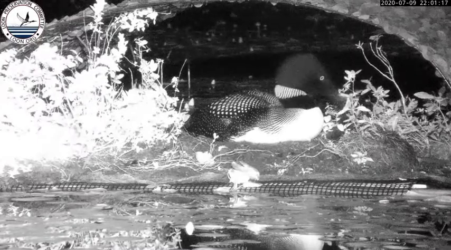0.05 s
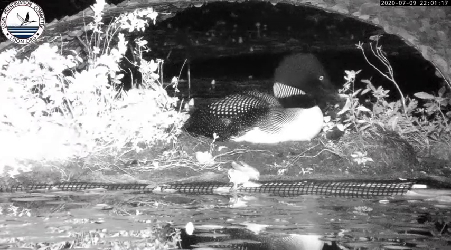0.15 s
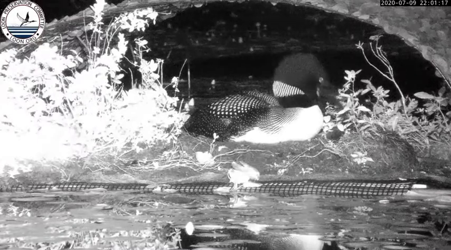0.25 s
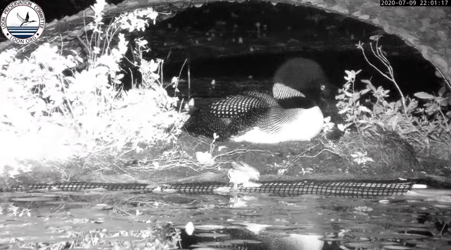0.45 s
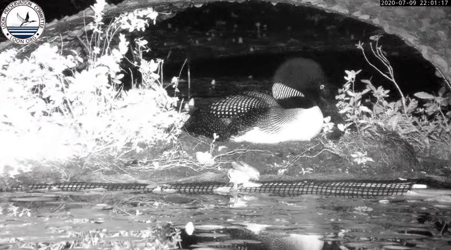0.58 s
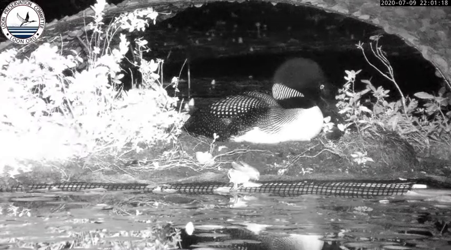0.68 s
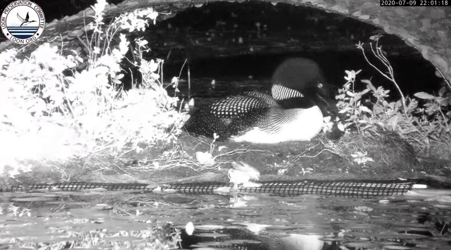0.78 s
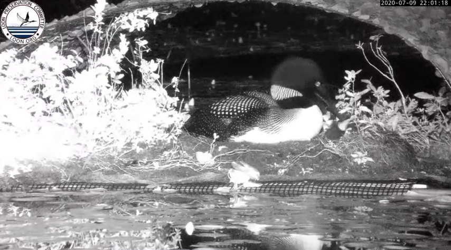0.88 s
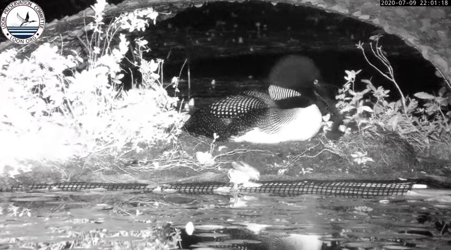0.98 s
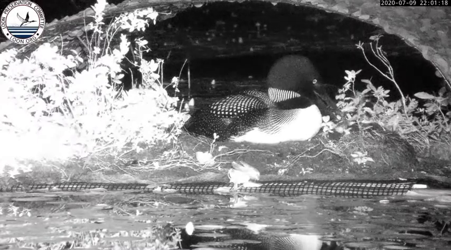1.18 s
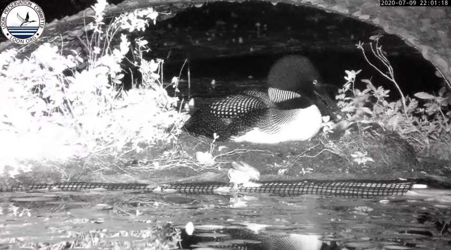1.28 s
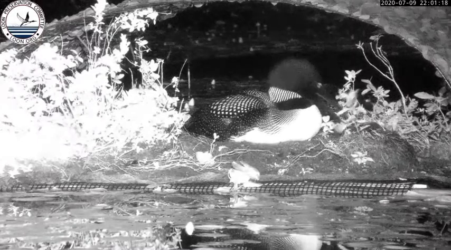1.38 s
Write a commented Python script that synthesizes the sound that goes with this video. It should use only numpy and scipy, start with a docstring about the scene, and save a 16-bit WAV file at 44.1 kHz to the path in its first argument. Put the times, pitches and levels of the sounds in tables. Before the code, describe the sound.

Close to the microphone, a nesting loon gives a short hoot that jumps up in pitch and falls, then a lower, gentler one. Behind it is still lakeside night air with a faint, distant machine hum.

```python
"""A loon's hoot starts low, breaks into a loud, slightly raspy high register and drops back.
A second hoot follows as a soft low arch. Both are syrinx harmonics shaped by the throat.
The bird is on its nest by a lake on a still night: the shores return faint echoes,
something rustles softly nearby, and a distant machine hums under the quiet air."""
import sys
import numpy as np
from scipy import signal
from scipy.fft import rfft, irfft
from scipy.io import wavfile

SR = 44100
rng = np.random.default_rng(int(sys.argv[2]) if len(sys.argv) > 2 else 0)


def wrap_up_sound(samples):
    """Save the sound to the file named by the first command line argument, as 16-bit audio."""
    columns = np.atleast_2d(samples).T
    # keep every value between -1 and 1, then stretch to whole-number steps
    tamed = np.clip(columns, -1, 1)
    steps = np.round(tamed * 32767).astype(np.int16)
    wavfile.write(sys.argv[1], SR, steps)


N = 63945
TIME = np.arange(N) / SR
CUTOFF_HZ = 7200

# High middle of the first hoot.
# Each row: time in seconds, pitch in Hz, level in dB, brightness in dB per octave, treble in dB.
CRY = [(.192, 588.7, -36.5, -3, -3.5), (.199, 625.5, -22.5, -6.5, -13), (0.205, 637, -17.5, -0.1, -4),
       (.216, 630.9, -17, 1, -3.5), (0.235, 638.6, -17, 0, -1), (0.247, 632.8, -19, 1, -5.5),
       (.272, 639.4, -19.5, 0, -6.5), (0.284, 630.3, -22, -0.65, 0), (0.304, 628.4, -22, -4.5, 3),
       (0.333, 611.6, -27.5, -2, -8.5), (0.341, 594, -37.5, -0.5, -22)]


def loon():
    """The voice flips into the high register, drops back with brief roughness, then hoots again low."""
    # Harmonic strength per register. Each row: frequency in Hz, level in dB.
    low_register = [(250, -3), (350, -2), (520, 6), (690, 1.5), (930, -6), (1040, -10), (1140, -20.5),
                    (1270, -20), (1400, -26), (1760, -31.5), (2080, -40.5), (2450, -34.5), (3400, -47.5),
                    (3800, -38.5), (4350, -54), (4900, -64.5), (6400, -60.5), (7300, -70)]
    high_register = [(630, 2), (1270, -12.5), (1900, -32), (2540, -33.5), (3170, -31), (3800, -27),
                     (4440, -32), (5070, -32.5), (5700, -64), (6340, -38), (7000, -54)]
    # Low start and fall of the first hoot, then the second hoot. Columns as in CRY.
    start = [(.163, 430, -59.5, -8.5, -7), (.176, 439, -38.5, 0, -5), (.187, 443, -35.5, 2.9, -4),
             (.194, 495, -37.5, 2.5, 4), (.200, 520, -50.5, -8.5, -7)]
    fall = [(0.331, 389.6, -52, -1, -3), (0.339, 381, -29.5, -0.5, -6.5), (0.352, 352.8, -28.5, 3.5, -4.5),
            (0.374, 337, -32, 3.5, -5.5), (0.397, 302.3, -36.5, -4, -1.5), (0.41, 280, -46.5, -11, -6.5),
            (0.423, 253, -72.5, 0, -5)]
    second_hoot = [(0.554, 315, -80, -18, -6), (0.559, 304.6, -45, -11.5, -5.5),
                   (0.567, 323.1, -32, -0.5, -13.5), (.594, 344.6, -29.5, -0.65, -6.5),
                   (.657, 350.2, -28.5, -2, 5), (0.701, 344.3, -29.5, -2.1, 4),
                   (0.752, 327.6, -31, -0.1, -4.5), (0.779, 315, -33.5, 0, -5),
                   (0.799, 307, -34, -1.5, -17.5), (0.821, 288, -37, -6, -11),
                   (0.841, 269, -38.5, -20, -22.5), (0.863, 254.6, -64.5, -20, -3)]
    # Noise at the register break. Each row: frequency in Hz, level in dB.
    break_colour = [(100, -12.5), (400, -3), (1400, -10), (2200, 3), (3100, -1), (4200, -28), (5000, -37),
                    (7000, -45)]
    cry, phase = hoot(CRY, high_register, shimmer_db_per_octave=.73, harmonics=11)
    low = sum(hoot(curve, low_register, shimmer_db_per_octave=.55, harmonics=20)[0]
              for curve in (start, fall, second_hoot))
    raspy_cry = cry + rasp(phase)
    register_break = swell(centre_s=.341, sigma_s=.007, db=-56.5) * noise(break_colour)
    return raspy_cry + register_break + low


def hoot(curve, register, shimmer_db_per_octave, harmonics):
    """Syrinx harmonics lifted by the throat, plus pulsed airflow. Returns sound and phase."""
    # Throat resonance, rising as the cry opens, then settling. Each row: time in seconds, centre in Hz.
    throat = [(.21, 1533), (.245, 1716), (.30, 1767), (.35, 1628)]
    # Airflow turbulence. Each row: frequency in Hz, level in dB.
    airflow_colour = [(80, -25.5), (250, -11), (650, 0), (1600, -6.5), (2400, -22), (4000, -23),
                      (7000, -36)]
    throat_peak_db, throat_sigma_hz = 13.5, 190
    tilt_from_hz, treble_ramp_hz = 468, (1850, 2700)
    jitter, airflow_db = .0018, -40.5
    times_s, pitches_hz, levels_db, brightnesses, trebles_db = np.transpose(curve)
    pitch_hz = np.interp(TIME, times_s, pitches_hz) * (1 + jitter * drift(rate_hz=50))
    brightness = np.interp(TIME, times_s, brightnesses)
    treble_db = np.interp(TIME, times_s, trebles_db)
    throat_hz = np.interp(TIME, *np.transpose(throat))
    phase = 2 * np.pi * np.cumsum(pitch_hz) / SR
    voice = from_db(airflow_db) * noise(airflow_colour) * (1 + np.cos(phase))
    for k in range(1, harmonics + 1):
        hz = k * pitch_hz
        octaves = np.log2(np.maximum(hz / tilt_from_hz, 1))
        tilt_db = (brightness + shimmer_db_per_octave * drift(rate_hz=35)) * octaves
        shelf_db = treble_db * np.interp(hz, treble_ramp_hz, [0, 1])
        throat_db = throat_peak_db * np.exp(-.5 * ((hz - throat_hz) / throat_sigma_hz) ** 2)
        gain = from_db(at_hz(register, hz) + throat_db + tilt_db + shelf_db)
        voice += gain * np.cos(k * phase) * (hz < CUTOFF_HZ)
    return voice * level_curve(times_s, levels_db), phase


def rasp(phase):
    """The pushed high register roughens: a turbulent puff each cycle, half-harmonics from unequal cycles."""
    # Rasp envelope. Each row: time in seconds, level in dB.
    envelope = [(.198, -77.5), (.216, -57.5), (.234, -54.5), (.247, -51.5), (.258, -56), (.277, -52),
                (.292, -66.5), (.325, -68), (.345, -76.5)]
    # Rasp spectrum. Each row: frequency in Hz, level in dB.
    colour = [(100, -42.5), (300, -3), (700, -1), (1600, 0), (2200, -21), (3200, -6), (4000, -11.5),
              (4700, -18), (5300, -6), (5900, -24), (6400, -14.5), (7200, -31)]
    puffs = noise(colour) * rms_one(1 + np.cos(phase))
    pitch_hz = np.median(np.array(CRY)[:, 1])
    half_harmonics = sum(from_db(at_hz(colour, k * pitch_hz)) * drift(rate_hz=35) * np.cos(k * phase)
                         for k in np.arange(1, 11) + .5)
    return level_curve(*np.transpose(envelope)) * (puffs + from_db(-.5) * rms_one(half_harmonics))


def lake(voice):
    """Scatter from the near bank and late shore echoes smeared by trees, all dulled."""
    # Shore echoes. Each row: delay in seconds, gain in dB before the low-pass.
    echoes = [(.275, -55), (.685, -51)]
    lowpass_hz = 910
    shores = sum(from_db(db) * np.interp(TIME - delay_s, TIME, voice, left=0) for delay_s, db in echoes)
    bank = from_db(-52.5) * scatter(voice, t60_s=.8)
    trees = from_db(-14) * scatter(shores, t60_s=.99)
    return signal.sosfilt(signal.butter(1, lowpass_hz, fs=SR, output="sos"), bank + shores + trees)


def scatter(x, t60_s):
    """A diffuse reflection that dies away."""
    tail = rng.standard_normal(N) * from_db(-60 * TIME / t60_s)
    return signal.fftconvolve(x, tail / np.sqrt(np.sum(tail ** 2)))[:N]


def rustles():
    """Soft, brief swells of noise near the nest."""
    # Each row: centre in seconds, Gaussian sigma in seconds, peak level in dB.
    swells = [(1.29, 0.026, -75.5), (1.363, 0.0087, -67.5), (1.413, 0.0075, -67)]
    # Rustle spectrum. Each row: frequency in Hz, level in dB.
    colour = [(300, 8.5), (650, -2), (1000, -6), (1600, 1.5), (2100, 3.5), (2700, -14.5), (5000, -20.5)]
    return sum(swell(*row) for row in swells) * noise(colour)


def machine_hum():
    """Wavering multiples of a distant machine's turning rate."""
    # Hum lines. Each row: multiple of the turning rate, rms level in dB.
    orders = [(4, -77), (5, -75), (6, -60.5), (8, -79), (9, -81)]
    turning_hz, waver_db = 24.74, .5
    hum = np.zeros(N)
    for k, db in orders:
        amplitude = np.sqrt(2) * from_db(db + waver_db * drift(rate_hz=6))
        hum += amplitude * np.sin(2 * np.pi * (k * turning_hz * TIME + rng.random()))
    return hum


def night_air():
    """Quiet, steady noise, mostly low."""
    # Air spectrum. Each row: frequency in Hz, level in dB.
    colour = [(20, -17.5), (55, -2), (85, 1.5), (140, -2), (250, -1), (400, -5), (700, -13), (1200, -16.5),
              (2500, -22), (5000, -27.5), (6800, -30), (7500, -40.5)]
    return from_db(-66) * noise(colour)


def from_db(db):
    """Decibels to gain."""
    return 10 ** (np.asarray(db) / 20)


def rms_one(x):
    """Scale to unit power."""
    return x / np.sqrt(np.mean(x ** 2) + 1e-20)


def at_hz(spectrum, hz):
    """Level in dB, interpolated over log frequency."""
    points_hz, db = np.transpose(spectrum)
    return np.interp(np.log(np.maximum(hz, 1)), np.log(points_hz), db)


def level_curve(times_s, db, fade_s=.004):
    """Gain through time, fading to silence at both ends."""
    inside = np.clip(np.minimum(TIME - times_s[0], times_s[-1] - TIME) / fade_s + .5, 0, 1)
    return from_db(np.interp(TIME, times_s, db)) * np.sin(np.pi / 2 * inside) ** 2


def swell(centre_s, sigma_s, db):
    """Bell-shaped rise and fall in gain."""
    return from_db(db) * np.exp(-.5 * ((TIME - centre_s) / sigma_s) ** 2)


def drift(rate_hz):
    """Random wander, mostly below rate_hz, rms 1."""
    hz = np.fft.rfftfreq(N, 1 / SR)
    return rms_one(irfft(rfft(rng.standard_normal(N)) / (1 + (hz / rate_hz) ** 2), N))


def noise(colour):
    """Noise of a given spectrum, rms 1."""
    hz = np.fft.rfftfreq(N, 1 / SR)
    return rms_one(irfft(rfft(rng.standard_normal(N)) * from_db(at_hz(colour, hz)), N))


def scene():
    """The bird close by, its echoes and the night, in mono."""
    voice = loon()
    return (voice + lake(voice) + machine_hum() + night_air() + rustles())[None]


def record(dry):
    """Steep low-pass at CUTOFF_HZ."""
    return signal.sosfilt(signal.ellip(10, .1, 80, CUTOFF_HZ, fs=SR, output="sos"), dry)


dry = scene()
out = record(dry)
wrap_up_sound(out)
```